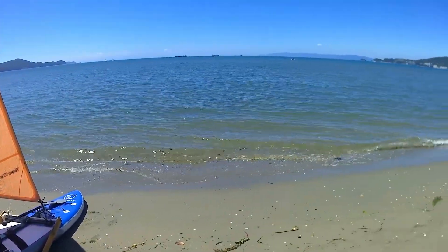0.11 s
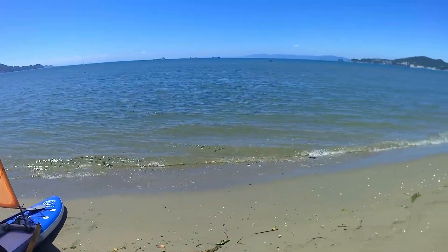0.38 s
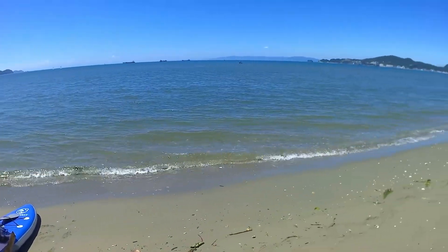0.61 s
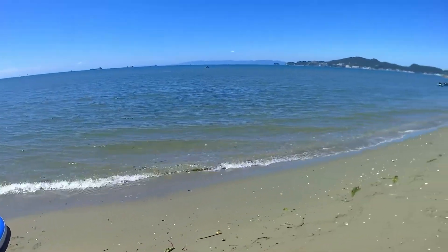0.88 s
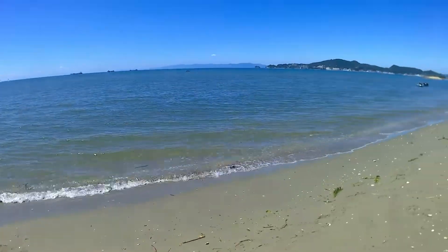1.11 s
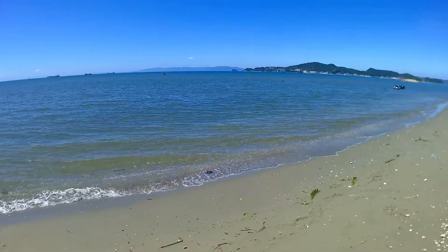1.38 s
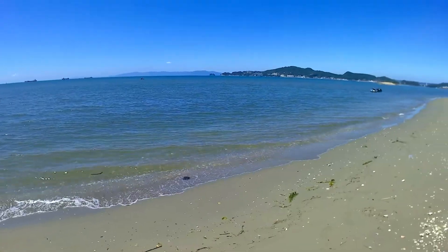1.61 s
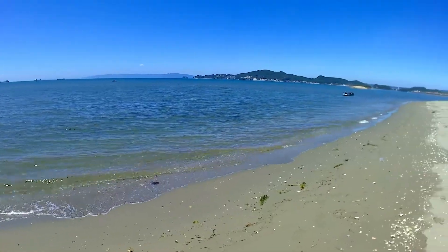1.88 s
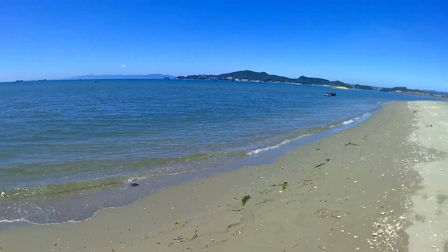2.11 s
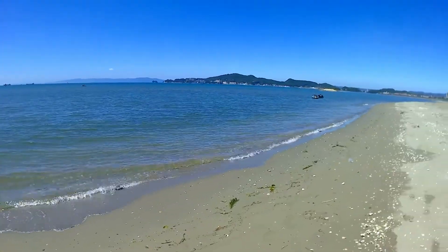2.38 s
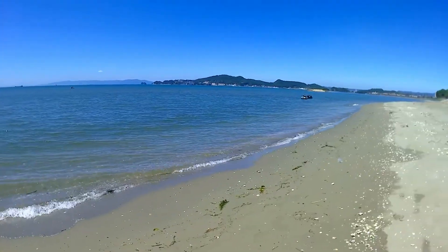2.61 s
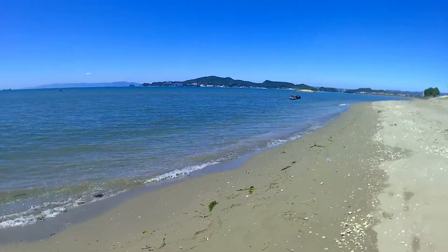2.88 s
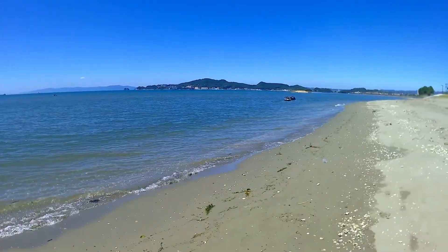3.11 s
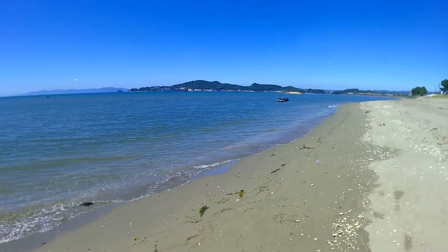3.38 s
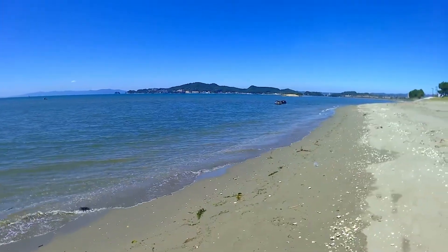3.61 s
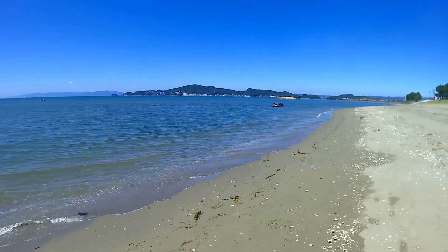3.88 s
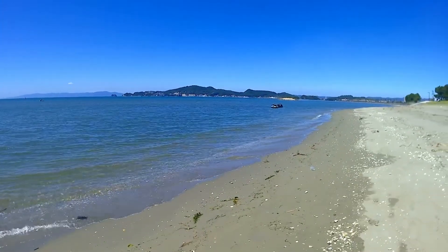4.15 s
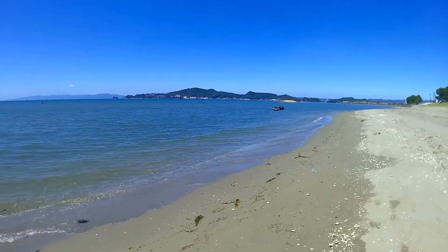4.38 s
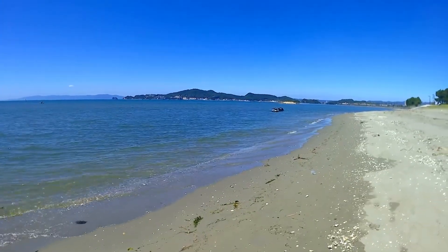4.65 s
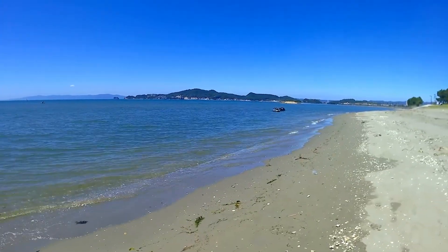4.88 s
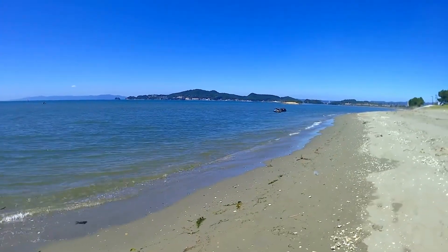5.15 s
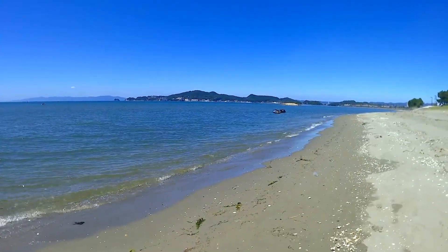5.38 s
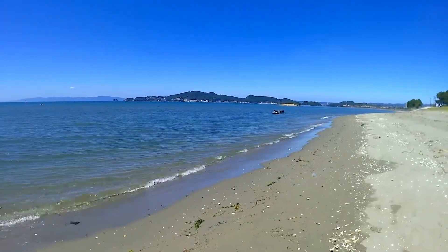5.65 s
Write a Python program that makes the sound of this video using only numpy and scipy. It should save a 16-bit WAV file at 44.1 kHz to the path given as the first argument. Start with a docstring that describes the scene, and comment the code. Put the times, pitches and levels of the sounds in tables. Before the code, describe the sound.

Small waves wash and fizz onto a sandy beach, with bubbly glugs and plops, while wind rumbles and thumps on a bare microphone.

```python
"""Small waves on a breezy beach

Small waves break and wash up the sand while a breeze buffets the bare microphone of a small camera.
Each wave is a cloud of ringing bubbles mixed with hissing foam; single bubbles glug and plop out of it.
Bursting foam cells tick close by. The wind is deep, shaped noise with thumping gusts.
The camera samples slowly and joins its samples by straight lines, which mirrors sound into the treble."""
import sys
import numpy as np
from scipy import signal
from scipy.io import wavfile
from scipy.ndimage import uniform_filter1d, map_coordinates

SR = 44100
rng = np.random.default_rng(int(sys.argv[2]) if len(sys.argv) > 2 else 0)


def invert_db(level):
    """Linear amplitude ratio for a level in decibels (20 dB per decade), elementwise."""
    return 10 ** (np.asarray(level, dtype=float) / 20)


def store_wav(level_fs):
    """Save 16-bit WAV to argv[1]."""
    pcm = np.round(np.clip(np.atleast_2d(level_fs), -1, 1) * 32767)
    wavfile.write(sys.argv[1], SR, pcm.T.astype(np.int16))


N = 254016  # length in samples


def evened(x):
    """Scales a sound to an rms of 1."""
    return x / np.sqrt(np.mean(x ** 2) + 1e-20)


def read_spectrum(points, hz):
    """Reads a spectrum table by straight lines on a log-frequency axis."""
    f, db = np.transpose(points)
    return np.interp(np.log(hz + 1), np.log(f + 1), db)


def curves(rows, t):
    """Joins the rows of a time table by straight lines, one curve for each column after the time."""
    s, *values = np.transpose(rows)
    return [np.interp(t, s, v) for v in values]


def shaped(x, field_db, size):
    """Colours a sound by a dB field over frequency and time."""
    overlap = size * 3 // 4
    hz, t, z = signal.stft(x, SR, nperseg=size, noverlap=overlap)
    coloured = z * invert_db(field_db(hz[:, None], t))
    return signal.istft(coloured, SR, nperseg=size, noverlap=overlap)[1][:N]


def bubble(hz, t60, rise, swell_cycles):
    """A bubble swells, rings, dies away by 60 dB in t60 seconds and climbs in pitch as it nears the surface."""
    t = np.arange(round(t60 * SR)) / SR
    swell = 1 - np.exp(-(t * hz / swell_cycles) ** 2)
    decay = invert_db(-60 * t / t60)
    return swell * decay * np.sin(2 * np.pi * hz * t * (1 + rise * t / t60))


# How the waves come and go: (t/s, wash level/dB, lift of the fizz/dB, lift of the finest spray/dB)
WAVE_CURVES = [(0, -36, -0.5, -5), (0.25, -34, 6.5, 0.5), (0.6, -31.5, 0, 1), (0.87, -31, -1, 1.5),
               (1.12, -38, 1.5, 4), (1.35, -44.5, 0.5, 0), (1.58, -40.5, 4, -5.5), (1.83, -43.5, 7.5, -1.5),
               (2.05, -34.5, 2.5, -2), (2.3, -33, 0, 3.5), (2.65, -32, -2, -0.5), (2.94, -36, 2, 0.5),
               (3.01, -41.5, 0.5, 1), (3.4, -40.5, 0.5, 1.5), (3.78, -37.5, -2, 1), (4.25, -43, 1.5, -1),
               (4.6, -42.5, 5, -4.5), (4.9, -39, 2.5, -0.5), (5.2, -35.5, 0.5, 1), (5.5, -35.5, 5, 4),
               (5.72, -31.5, 1.5, 3.5)]
# Colour of the surf as the microphone port passes it: (f/Hz, level per hertz/dB)
FOAM_COLOUR = [(71, 2), (120, 2.5), (139, -9), (176, -6.5), (213, -4), (269, -3), (505, -8), (688, -3.5),
               (857, -2), (1170, -5), (1390, -8.5), (2100, -12), (2360, -17), (3150, -23), (3350, -27),
               (3900, -26), (4050, -47), (5200, -80), (8800, -120)]


def wash():
    """Bubbles and hiss share one colour; the foam seethes in patches and in brief wide spurts."""
    bubble_share = 0.6  # of the energy, before the small lift of the hiss
    hiss = 1.09 * rng.standard_normal(N)
    source = np.sqrt(bubble_share) * bubble_cloud(7000, 1.12, 23.0, count=36)
    source = source + np.sqrt(1 - bubble_share) * hiss

    def colour(hz, t):
        level_db, fizz_db, spray_db = curves(WAVE_CURVES, t)
        # the low body sinks less than the rest in a lull; at a level of -30 dB it is left as it is
        body_db = -0.07 * (level_db + 30)
        patches = random_patches(len(hz), len(t))
        # above 3100 Hz one hears small holes in the sound, placed here where a patch value is high
        holes_db = (hz > 3100) * -22 * np.clip(patches - 0.95, 0, 2)
        body = 1 / (1 + (hz / 520) ** 6)  # the biggest bubbles
        spray = 1 / (1 + (2450 / (hz + 1)) ** 8)  # the smallest bubbles
        fizz = 1 / (1 + (1450 / (hz + 1)) ** 8) - spray  # the band just below the spray
        lifts_db = body * body_db + fizz * fizz_db + spray * spray_db
        seething_db = 0.75 * patches + 0.68 * lap_spurts(t)
        return read_spectrum(FOAM_COLOUR, hz) + holes_db + lifts_db + seething_db

    level_db = curves(WAVE_CURVES, np.arange(N) / SR)[0]
    return invert_db(level_db) * evened(shaped(source, colour, size=1024))


def bubble_cloud(per_s, spread_db, cycles, count):
    """Thousands of bubbles of many sizes, a few of them louder, equal in energy per hertz."""
    pitches = np.geomspace(130, 3900, count)  # Hz
    cloud = np.zeros(N)
    for hz in pitches:
        born = rng.random(N) < per_s * hz / pitches.sum() / SR
        loudness = np.minimum(rng.exponential(1, N), 4)
        births = born * invert_db(spread_db * loudness)
        ringing = signal.oaconvolve(births, bubble(hz, cycles / hz, 0.34, 0.34))[:N]
        cloud += np.sqrt(hz) * evened(ringing)
    return evened(cloud)


def random_patches(bands, frames):
    """Random unevenness, smoothed over neighbouring pitches and moments."""
    chance = rng.standard_normal((frames, bands)).T
    across_pitch = uniform_filter1d(chance, size=7, axis=0)
    return evened(uniform_filter1d(across_pitch, size=12, axis=1))


# The clearest small laps that slap the sand: (t/s, relative strength)
CLEAR_LAPS = [(0.245, 2.2), (0.6, 1.4), (2.47, 1.7), (2.78, 2), (2.93, 1.7), (3.14, 1.9), (3.69, 1.5),
              (5.2, 1.3), (5.35, 1.5)]


def lap_spurts(t):
    """Small laps land at once and drain slowly; chance laps fill in around the clearest ones."""
    laps = (rng.random(len(t)) < 0.07) * rng.exponential(1, len(t))
    for s, strength in CLEAR_LAPS:
        laps[np.searchsorted(t, s)] = strength
    return evened(signal.lfilter([1], [1, -0.75], laps))  # each step keeps 0.75 of the last


# Bubbles that stand out of the foam, from deep glugs to light plops: (t/s, peak level/dB, starting f/Hz)
CLEAR_BUBBLES = [(0.434, -26.5, 910), (0.505, -42, 184), (0.597, -21.5, 920), (2.077, -27, 800),
                 (2.088, -26, 974), (2.144, -31.5, 271), (2.374, -27.5, 670), (2.409, -27.5, 180),
                 (2.452, -32, 274), (2.467, -25.5, 1130), (2.624, -29, 175), (2.781, -27, 740),
                 (2.786, -32, 183), (2.788, -26.5, 706), (2.853, -26, 332), (2.912, -33.5, 683),
                 (3.308, -35.5, 1160), (3.693, -29.5, 293), (3.839, -34.5, 197), (3.915, -32, 272),
                 (5.1, -31, 140), (5.239, -31, 209)]


def single_bubbles():
    """Glugs and plops are one bubble each; smaller bubbles ring for more cycles."""
    out = np.zeros(N)
    for s, db, hz in CLEAR_BUBBLES:
        ring_cycles = 24.5 * (hz / 400) ** 0.12  # cycles to fall by 60 dB
        sound = bubble(hz, ring_cycles / hz, rise=0.059, swell_cycles=1.12)
        sound = invert_db(db) * sound / abs(sound).max()
        part = out[round(s * SR):][:len(sound)]
        part += sound[:len(part)]
    return out


# Foam cells that burst close by: (t/s, peak level/dB)
FOAM_BURSTS = [(0.228, -30), (2.816, -26), (3.1462, -34), (3.432, -46), (5.528, -27)]


def ticks():
    """A bursting foam cell is a click that rings very briefly."""
    bursts = np.zeros(N)
    for s, db in FOAM_BURSTS:
        bursts[round(s * SR)] = invert_db(db)
    click = bubble(1700, 0.006, rise=0.22, swell_cycles=0.22)
    return signal.oaconvolve(bursts, click / abs(click).max())[:N]


# Colour of the turbulence that presses on the diaphragm: (f/Hz, level per hertz/dB)
BUFFET_COLOUR = [(4.7, -34), (8.0, -6), (34, -1.5), (47, -7), (92, -9.5), (166, -18.5), (300, -31.5),
                 (390, -25), (660, -120)]
# How the breeze changes: (t/s, level/dB, sharpness as lift per octave/dB)
BREEZE_CURVES = [(0, -26, 0), (0.55, -27.5, 1.5), (0.66, -33.5, 0.5), (1.15, -32.5, -0.5), (1.8, -38, 0.5),
                 (2.4, -34.5, -3.5), (3.0, -35, -2), (3.6, -35, -3.5), (4.2, -32, -1), (5.0, -33.5, -2.5),
                 (5.76, -31.5, -5)]


def wind():
    """Turbulent air presses in lumps; a sharper breeze reaches higher, a thump is deep."""
    def colour(hz, t):
        sharpness = curves(BREEZE_CURVES, t)[1] - 0.53 * thumps(t)  # a thump dulls the sound
        return read_spectrum(BUFFET_COLOUR, hz) + sharpness * np.log2((hz + 10) / 45)

    lumps = evened(shaped(rng.standard_normal(N), colour, size=4096))
    # the noise's own chance swells are partly levelled, so that the breeze and thump curves set the strength
    swells = uniform_filter1d(lumps ** 2, size=4000)
    lumps /= (swells + 0.046) ** 0.44
    t = np.arange(N) / SR
    level_db = curves(BREEZE_CURVES, t)[0] + thumps(t)
    return invert_db(level_db) * evened(lumps)


# Single gusts that thump the diaphragm: (t/s, lift over the breeze level/dB)
GUST_THUMPS = [(0.16, 6), (0.44, 1), (1.38, 2), (2.53, 2), (2.77, 6), (3.18, 1), (3.29, 4.5), (3.41, 7.5),
               (3.73, 4), (3.97, 8), (4.1, 3.5), (4.28, 5), (4.52, 7), (4.7, 9), (4.88, 2.5), (5.04, 1.5),
               (5.2, 11), (5.57, -0.5)]


def thumps(t):
    """Each gust is a short bell-shaped lift in dB."""
    half_length = 0.025  # s, from the peak to where the lift has fallen to 1/e
    return sum(lift_db * np.exp(-((t - s) / half_length) ** 2) for s, lift_db in GUST_THUMPS)


def scene():
    """Adds the surf, its bubbles and ticks, and the wind on the microphone."""
    return (wash() + single_bubbles() + ticks() + wind())[None]


def band_limit(x):
    """A steep low-pass at the top of the band."""
    return signal.sosfilt(signal.butter(12, 15610, fs=SR, output="sos"), x)


def record(dry):
    """The camera samples slowly, joins the samples by straight lines and leaks in a second rate change."""
    samples_per_s, resampled_per_s = 8000, 32000
    t = np.arange(N) / SR
    sampled_at = np.arange(0, N / SR, 1 / samples_per_s)
    samples = map_coordinates(dry[0], [sampled_at * SR], order=3, mode="nearest")
    joined = np.interp(t, sampled_at, samples)
    # the slope of the sound leaks through around the second rate and folds down into the treble
    folded = np.gradient(joined) * np.cos(2 * np.pi * resampled_per_s * t)
    folded = np.convolve(folded, [1, -2, 1], "same")  # favours the treble
    mix = (joined + invert_db(-24) * folded)[None]
    return band_limit(mix)


dry = scene()
out = record(dry)
store_wav(out)
```